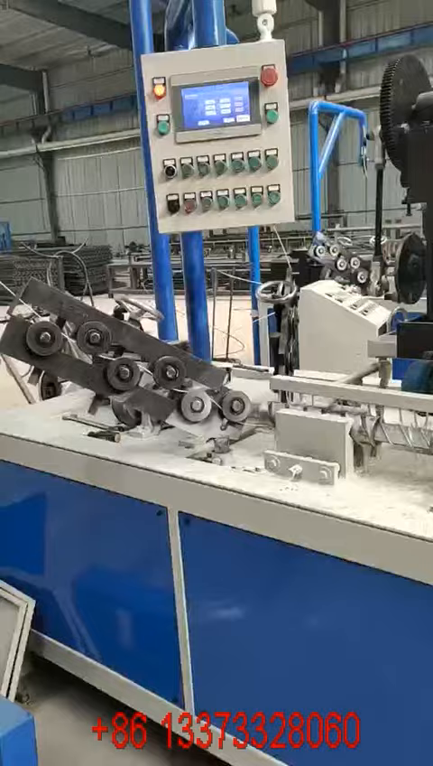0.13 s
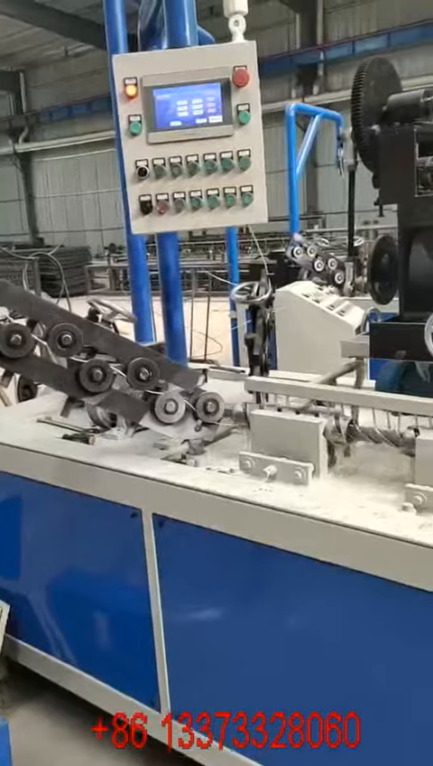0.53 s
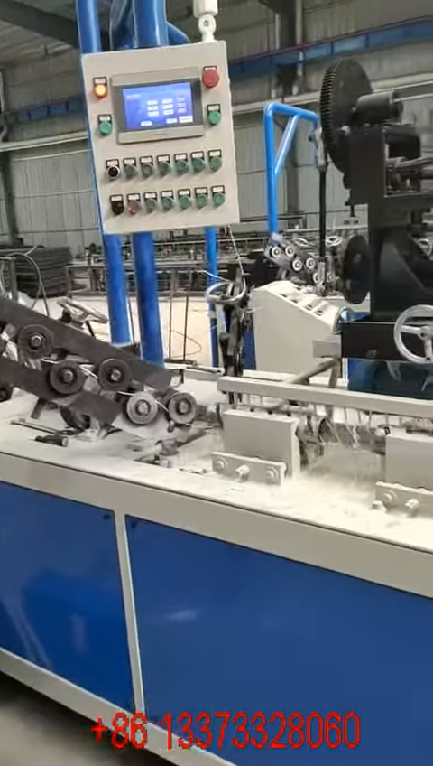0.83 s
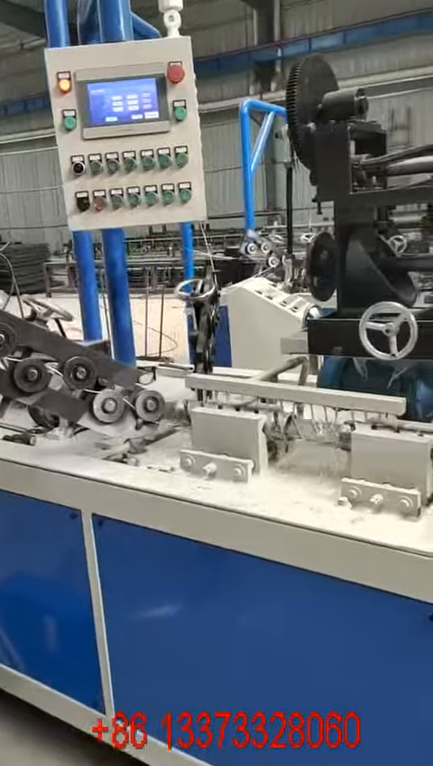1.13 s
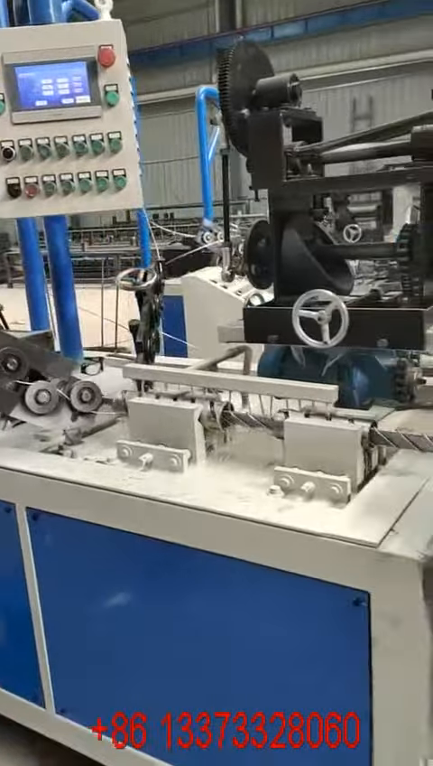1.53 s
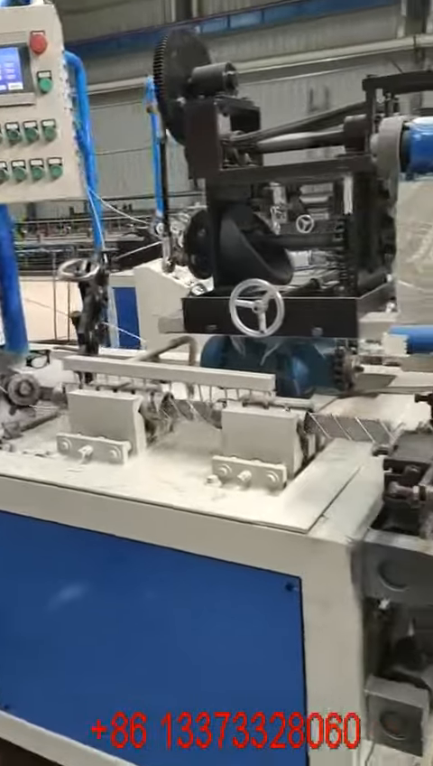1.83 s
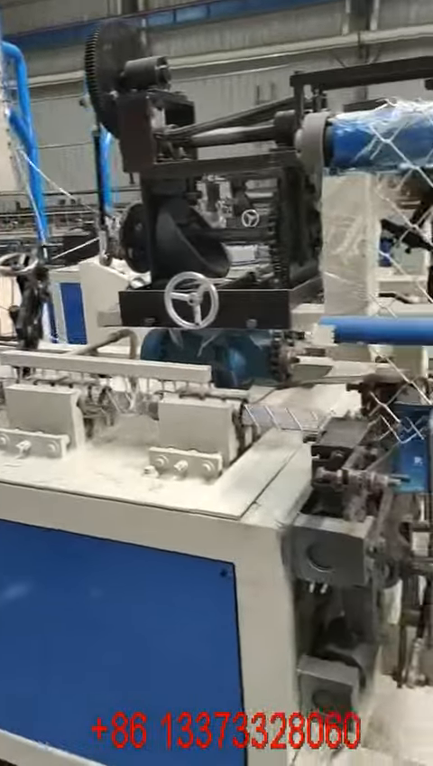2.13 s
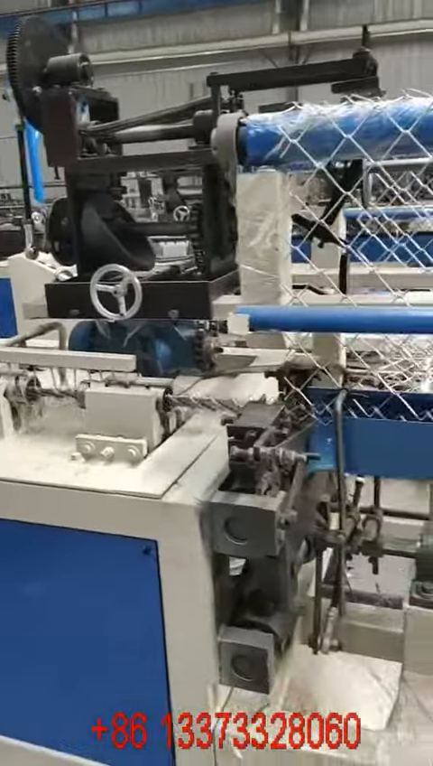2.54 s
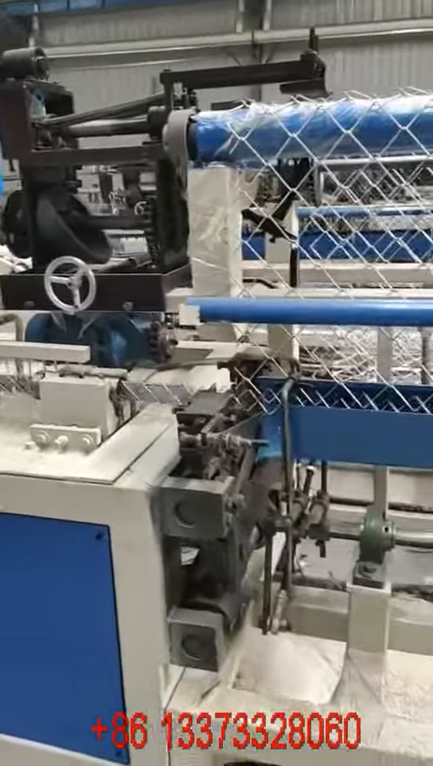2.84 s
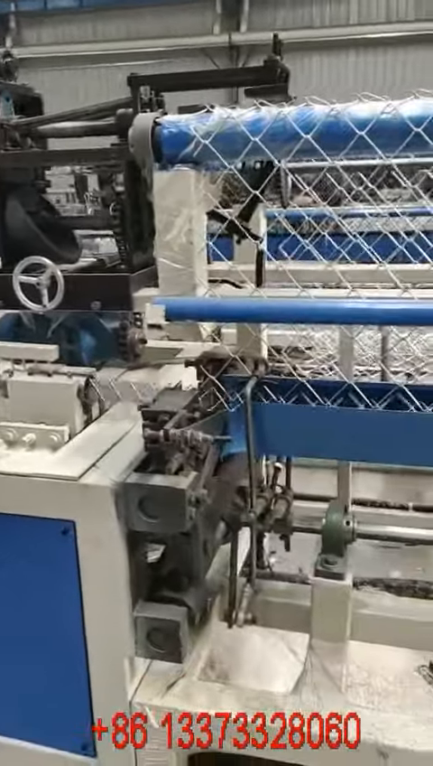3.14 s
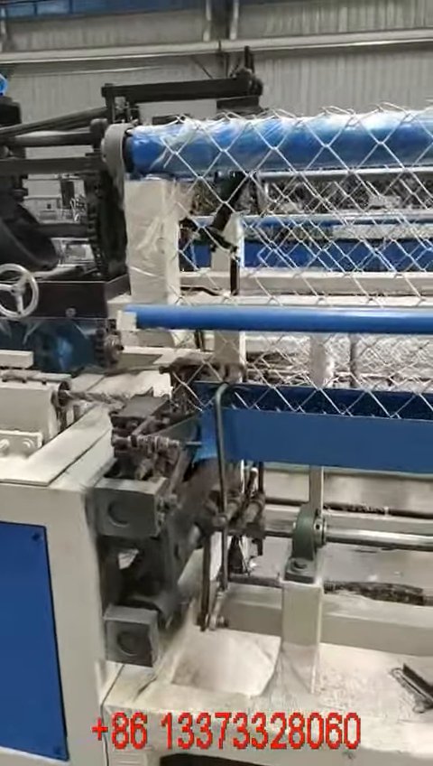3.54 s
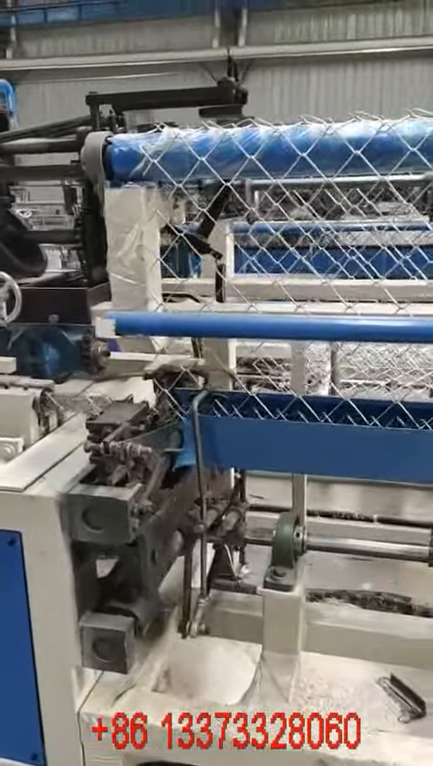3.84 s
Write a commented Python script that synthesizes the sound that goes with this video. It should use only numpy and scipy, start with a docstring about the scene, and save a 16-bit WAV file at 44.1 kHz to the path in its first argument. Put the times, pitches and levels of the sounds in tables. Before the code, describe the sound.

A chain-link fence machine runs close by, striking sharp steel clacks about six times a second. Wire rattles and scrapes between strokes, while heavy parts clunk over the churning, whining drive. The factory hall rings behind it.

```python
"""A chain-link fence machine runs close by in a factory hall.
The sound fades in on the churn and whine of the drive and the jingle of the mesh.
Heavy parts clunk in the frame; six times a second steel strikes steel and the wire rattles on.
Wire scrapes through its guides between strokes; later a hollow part knocks now and then.
The hall rings behind the blows, and a limiter ducks the drive under each loud clack."""
import sys
import numpy as np
from scipy import signal
from scipy.fft import rfft, irfft
from scipy.io import wavfile
from scipy.ndimage import uniform_filter1d

SR = 44100
rng = np.random.default_rng(int(sys.argv[2]) if len(sys.argv) > 2 else 0)


def inscribe(sig):
    """Save sig as 16-bit PCM at rate SR to the path in sys.argv[1].

    A 1-D sig is mono; a 2-D sig holds one channel per row.
    Samples are clipped to [-1, 1] before scaling.
    """
    pcm = np.round(np.clip(np.atleast_2d(sig).T, -1, 1) * 32767)
    wavfile.write(sys.argv[1], SR, pcm.astype(np.int16))


N = 176400

# Steel clacks. Each row: start in seconds, strike in dB, ring pitch in Hz, ring in dB, rattle in dB.
CLACKS = [(.323, -16, 5900, -35, -22.5), (.492, -16, 8000, -15, -17.5), (.664, -12.5, 4900, -27, -28.5),
          (.737, -20.5, 5900, -31, -23), (1.0682, -13, 5970, -20, -17), (1.2366, -10.5, 6230, -13, -16.5),
          (1.4044, -8, 4990, -10, -17.5), (1.5722, -10, 5940, -9.5, -17.5), (1.744, -7.5, 5950, -8.5, -18),
          (1.9032, -7, 6040, -16, -18), (2.0753, -8.5, 4730, -8.5, -14), (2.2399, -13, 6260, -12, -15),
          (2.281, -17, 4430, -21, -30.5), (2.4092, -8.5, 5980, -14, -14), (2.5761, -7.5, 5870, -11, -14.5),
          (2.648, -18.5, 2600, -20, -30), (2.741, -10.5, 4430, -12, -13), (2.9067, -12, 4440, -18, -16.5),
          (2.929, -12.5, 5900, -25, -18.5), (3.0823, -6.5, 5860, -7, -13.5), (3.2508, -8, 5900, -10, -15),
          (3.4148, -12, 5550, -18, -13), (3.5014, -16, 6200, -20, -18.5), (3.5881, -2.5, 4600, -17, -12.5),
          (3.759, -5, 4440, -19, -15), (3.9293, -6.5, 5720, -9, -14.5)]


def amp(db):
    """Decibels to gain."""
    return 10 ** (np.asarray(db) / 20)


def unit_rms(x):
    """Scales to rms 1."""
    return x / np.sqrt(np.mean(x ** 2) + 1e-20)


def at_hz(points, hz):
    """Reads a table on a log-frequency axis."""
    f, value = np.transpose(points)
    return np.interp(np.log(hz + 1), np.log(f + 1), value)


def over_time(points):
    """Interpolates (seconds, value) rows at every sample."""
    return np.interp(np.arange(N) / SR, *np.transpose(points))


def add(mix, start_s, sound):
    """Mixes a sound into a stereo track."""
    part = mix[:, max(round(start_s * SR), 0):][:, :sound.shape[-1]]
    part += sound[..., :part.shape[1]]


def pulse(t, rise_s, decay_s):
    """Envelope of a blow: exponential rise and decay."""
    return (1 - np.exp(-t / rise_s)) * np.exp(-t / decay_s)


def drift(rate_hz):
    """Slow random motion of rms 1."""
    hz = np.fft.rfftfreq(N, 1 / SR)
    return unit_rms(irfft(rfft(rng.standard_normal(N)) * np.exp(-(hz / rate_hz) ** 2), N))


def mottled(x, depth_db):
    """Random patches of level over pitch and time, the same in both channels."""
    z = signal.stft(x, nperseg=256)[2]
    patches = uniform_filter1d(rng.standard_normal(z.shape[1:]), size=5, axis=0)
    patches = unit_rms(uniform_filter1d(patches, size=9, axis=1))
    return signal.istft(z * unit_rms(amp(depth_db * patches)), nperseg=256)[1][:, :x.shape[1]]


def radiate(pair, spectrum):
    """Colours two unrelated signals at equal power and makes them alike in the bass."""
    # Stereo image. Each row: frequency in Hz, left-right correlation.
    likeness = [(250, 0.96), (500, 0.76), (1000, 0.34), (2500, 0.42), (6000, 0.2), (16000, 0)]
    hz = np.fft.rfftfreq(2 * N, 1 / SR)
    a, b = rfft(pair, 2 * N)
    same = np.clip(at_hz(likeness, hz), -1, 1)
    mid, side = a * np.sqrt((1 + same) / 2), b * np.sqrt((1 - same) / 2)
    return irfft(np.array([mid + side, mid - side]) * unit_rms(amp(at_hz(spectrum, hz))))[:, :N]


def churn():
    """Chains, rollers and bearings: a dense noise that flickers in patches."""
    # Drive noise. Each row: frequency in Hz, relative density in dB.
    spectrum = [(25, -21), (55, -17), (95, -8), (120, -5), (165, 0), (230, 2), (290, -1.5), (430, 2),
                (570, 1), (670, -3), (850, 0), (1250, -4.5), (2200, -6), (4000, -12.5), (8000, -13),
                (16000, -25)]
    # Passing the drive. Each row: time in seconds, level in dB.
    level = [(0, -25), (2.4, -24), (4, -24.5)]
    noise = mottled(rng.standard_normal((2, N)), depth_db=2)
    flicker_db = 0.5 * drift(rate_hz=150)
    return amp(over_time(level)) * radiate(unit_rms(noise * amp(flicker_db)), spectrum)


def gears():
    """Wavering tones of motor and gears, reaching each microphone port a little differently."""
    # Drive tones. Each row: pitch in Hz, level in dB, rms wander in Hz.
    tones = [(97.1, -50.5, 5.2), (202.3, -40, 4.1), (232.8, -42.5, 5.58), (539, -43, 5.03),
             (701, -50.5, 4.04), (997, -38, 2.8), (1023, -44, 6.64), (1654, -46.5, 7.04)]
    # Passing the gears. Each row: time in seconds, gain in dB.
    gain = [(.5, -4.5), (1.2, 0), (2.6, 1), (3.9, -2)]
    out = np.zeros((2, N))
    for hz, db, wander_hz in tones:
        turns = np.cumsum(hz + wander_hz * drift(rate_hz=14.0)) / SR
        apart = np.array([[1], [-1]]) * drift(rate_hz=2.7) * hz / 14000
        out += amp(db + 1.7 * drift(rate_hz=5.9)) * unit_rms(np.sin(2 * np.pi * (turns + apart)))
    return out * amp(over_time(gain))


def chatter(t, touches_per_s=450, touch_s=0.0028):
    """Loose wire touching steel at random: tiny bursts over a steady hiss."""
    touches = (rng.random(len(t)) < touches_per_s / SR) * rng.uniform(0.49, 1, len(t))
    power = signal.lfilter([1], [1, -np.exp(-2 / (touch_s * SR))], touches)
    return unit_rms(np.sqrt(power + 0.38) * rng.standard_normal((2, len(t))))


def mesh(dip_db=-12.5, dip_s=0.028, hard_db=-12.5):
    """Running wire and finished links jingle against steel, settling before each hard stroke."""
    # Mesh jingle. Each row: frequency in Hz, relative density in dB.
    spectrum = [(200, -21), (1200, -10), (1850, 3), (2600, -5), (3500, -19), (6000, 6), (8500, -2),
                (10500, -6), (16000, -4.5)]
    # Swell of the jingle. Each row: time in seconds, level in dB.
    level = [(.5, -35), (1.0, -34.5), (1.8, -28), (2.8, -32.5), (4, -31)]
    t = np.arange(N) / SR
    settling = sum((t < start_s) * np.exp(-((t - start_s) / dip_s) ** 2)
                   for start_s, strike_db, *_ in CLACKS if strike_db > hard_db)
    return amp(over_time(level) + dip_db * settling) * radiate(chatter(t), spectrum)


def ringing(modes, t, detune=0.012):
    """Dying modes; every blow excites them a little differently."""
    out = np.zeros((2, len(t)))
    for hz, db, t60_s in modes:
        envelope = amp(db + 2 * rng.standard_normal() - 60 * t / t60_s)
        turns = hz * (1 + detune * rng.standard_normal()) * t + rng.random()
        apart = rng.random((2, 1)) * min(hz / 4000, 1)
        out += envelope * np.sin(2 * np.pi * (turns + apart))
    return out


def clunks(rise_s=0.0028):
    """Heavy parts knock in the frame: a clank of panels over a longer, lower thump."""
    # Blows in the frame. Each row: start in seconds, clank gain in dB, thump gain in dB.
    blows = [(.315, -18, -32), (.428, -17, -26), (.466, -19, -22), (.765, -19, -28), (0.8, -15, -22),
             (1.095, -14, -17), (1.132, -11.5, -25), (1.428, -16, -17), (1.46, -20.5, -25),
             (1.772, -21, -20), (2.025, -25, -25), (2.094, -16, -21), (2.428, -18, -19),
             (2.648, -27, -19.5), (2.765, -24, -30), (2.986, -23, -25.5), (3.098, -18.5, -21),
             (3.438, -19, -23), (3.798, -17.5, -24.5)]
    # Clank and thump noise. Each row: frequency in Hz, relative density in dB.
    clank_spectrum = [(100, -40), (400, -17), (800, 0), (1200, 1), (1800, -3.5), (3000, -13), (6000, -11),
                      (16000, -28)]
    thump_spectrum = [(30, -19), (100, -34), (200, 4), (300, -3), (550, 1.5), (900, -18), (2000, -40),
                      (16000, -86)]
    # Frame panels. Each row: frequency in Hz, relative level in dB, T60 in seconds.
    panel_modes = [(545.4, -8.5, 0.17), (856, -10, 0.11), (1048.5, -5.5, 0.13), (1210, -8, 0.077),
                   (1354, -7.5, 0.041), (1740, -18, 0.052)]
    t = np.arange(SR // 4) / SR
    clanks, panels, thumps = np.zeros((3, 2, N))
    for start_s, clank_db, thump_db in blows:
        clank_noise, thump_noise = rng.standard_normal((2, 2, len(t)))
        add(clanks, start_s, amp(clank_db) * pulse(t, rise_s, decay_s=0.015) * clank_noise)
        add(panels, start_s, amp(clank_db) * ringing(panel_modes, t))
        add(thumps, start_s, amp(thump_db) * pulse(t, rise_s, decay_s=0.027) * thump_noise)
    return amp(-2.5) * radiate(clanks, clank_spectrum) + panels + radiate(thumps, thump_spectrum)


def hall(x, build_s=0.0096):
    """Dense reflections, each band dying at its own speed."""
    # Hall decay. Each row: frequency in Hz, T60 in seconds.
    t60 = [(100, 0.26), (500, 1), (2000, 0.68), (6000, 0.46), (16000, 0.33)]
    hz, t, z = signal.stft(rng.standard_normal((2, SR)), SR, nperseg=256)
    envelope = amp(-60 * t / at_hz(t60, hz)[:, None]) * (1 - np.exp(-t / build_s))
    tail = signal.istft(z * envelope, SR, nperseg=256)[1]
    return signal.fftconvolve(x, tail / np.linalg.norm(tail[0]), axes=1)[:, :N]


def clacks(rattle_s=0.044, wet_db=-5):
    """Steel strikes steel and rings, then the wire rattles; only strike and rattle feed the hall."""
    # Strike and rattle noise. Each row: frequency in Hz, relative density in dB.
    strike_spectrum = [(100, -33), (600, -11), (1500, 2.5), (3000, 1.5), (4500, 1.5), (7000, 2),
                       (11000, -2.5), (16000, -2)]
    rattle_spectrum = [(100, -31), (600, 6), (1200, -3), (1900, 4), (3000, 6), (4500, 4), (7000, 5.5),
                       (11000, 3), (16000, -20)]
    # Struck steel. Each row: frequency in Hz, relative level in dB, T60 in seconds.
    steel_modes = [(1465, -19, 0.3), (1777, -14.5, 0.15), (2824, -19, 0.13), (4480, -8.5, 0.068),
                   (5000, -12, 0.053), (6060, -10.5, 0.072), (7370, -12, 0.084)]
    t = np.arange(SR // 4) / SR
    strikes, rings, rattles = np.zeros((3, 2, N))
    for start_s, strike_db, ring_hz, ring_db, rattle_db in CLACKS:
        noise = mottled(rng.standard_normal((2, len(t))), depth_db=2)
        add(strikes, start_s, amp(strike_db) * pulse(t, rise_s=0.00065, decay_s=0.0073) * noise)
        ring = 2 * np.sin(2 * np.pi * (ring_hz * t + rng.random() + 0.32 * rng.random((2, 1))))
        add(rings, start_s, amp(ring_db) * pulse(t, rise_s=0.00096, decay_s=0.0022) * ring)
        add(rings, start_s, amp(strike_db) * (ringing(steel_modes, t) + tings(t)))
        rattle_envelope = (1 - np.exp(-t / 0.0028)) * np.exp(-(t / rattle_s) ** 2)
        add(rattles, start_s, amp(rattle_db) * rattle_envelope * mottled(chatter(t), depth_db=2))
    clash = radiate(strikes, strike_spectrum) + radiate(rattles, rattle_spectrum)
    return clash + rings + hall(amp(wet_db) * clash)


def tings(t, count=5, low_hz=2793, high_hz=8570, gain_db=-8.5, decay_s=0.0073):
    """Stray partials of the wire, at new random pitches on every strike."""
    hz = low_hz * (high_hz / low_hz) ** rng.random((count, 1, 1))
    partials = np.sin(2 * np.pi * (hz * t + rng.random((count, 2, 1)))).sum(0)
    return amp(gain_db) * partials * np.exp(-t / decay_s)


def slides(level_db=-26, width_s=0.036):
    """Wire scrapes through its guides between the strokes."""
    # Wire slides. Each entry: peak time in seconds.
    peaks_s = [.585, .87, .95, 1.511, 1.82, 2.0, 2.34, 2.51, 2.86, 3.0, 3.19, 3.35, 3.68, 3.85]
    # Scrape noise. Each row: frequency in Hz, relative density in dB.
    spectrum = [(100, -38), (1200, -5), (2500, 2), (5500, 1.5), (8500, 1.5), (12000, -3.5), (16000, -9)]
    t = np.arange(N) / SR
    swells = sum(np.exp(-((t - peak_s) / width_s) ** 2) for peak_s in peaks_s)
    return amp(level_db) * swells * radiate(mottled(chatter(t), depth_db=4.5), spectrum)


def knocks():
    """A hollow part of the frame is knocked and rings briefly at one pitch."""
    # Hollow knocks. Each row: start in seconds, pitch in Hz, gain in dB.
    blows = [(1.432, 582, -15), (1.694, 542, -16), (2.022, 557, -15), (2.646, 850, -20), (3.183, 570, -21)]
    t = np.arange(SR // 4) / SR
    out = np.zeros((2, N))
    for start_s, hz, db in blows:
        tone = np.sin(2 * np.pi * (hz * t + rng.random()))
        add(out, start_s, amp(db) * pulse(t, rise_s=0.0027, decay_s=0.014) * tone)
    return out


def scene(frame_wet_db=-7):
    """The machine in its hall."""
    frame = clunks() + knocks()
    return clacks() + frame + hall(amp(frame_wet_db) * frame) + slides() + churn() + mesh() + gears()


def record(dry):
    """Microphone port colour, a quick limiter, the fade-in, a soft ceiling and the band limit."""
    # Port responses. Each row: frequency in Hz, gain in dB.
    left_port = [(100, 0), (2900, 2.5), (3500, -1), (4600, 1.5), (6700, -4), (7300, 2.5), (8500, 1),
                 (10000, -3.5), (15500, 3)]
    right_port = [(100, 0.5), (3300, 1), (6200, 4.5), (7000, -3), (10000, -3.5), (13600, 7), (15500, 9)]
    # Fade-in. Each row: time in seconds, gain in dB.
    fade_in = [(.137, -82), (.142, -30), (.25, -16.5), (.34, -11.5), (.46, -8), (.7, -4.5), (1.0, -2)]
    threshold_db, duck_share, recover_db_per_s = -13.5, 0.4, 165
    ceiling_db, cutoff_hz = -1, 15600
    hz = np.fft.rfftfreq(2 * N, 1 / SR)
    x = irfft(rfft(dry, 2 * N) * amp([at_hz(left_port, hz), at_hz(right_port, hz)]))[:, :N]
    power_db = 10 * np.log10(abs(uniform_filter1d((x ** 2).mean(0), size=130)) + 1e-12)
    fall_db = np.arange(N) / SR * recover_db_per_s
    held_db = np.maximum.accumulate(power_db + fall_db) - fall_db  # peak hold with steady release
    duck_db = duck_share * uniform_filter1d(np.maximum(held_db - threshold_db, 0), size=90)
    x = x * amp(over_time(fade_in) - duck_db)
    x = amp(ceiling_db) * np.tanh(x / amp(ceiling_db))
    lowpass = signal.firwin(511, cutoff_hz, window=("kaiser", 9), fs=SR)
    return signal.oaconvolve(x, lowpass[None], "same")


dry = scene()
out = record(dry)
inscribe(out)
```